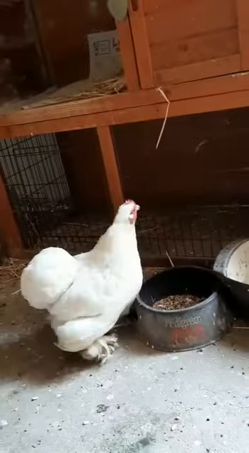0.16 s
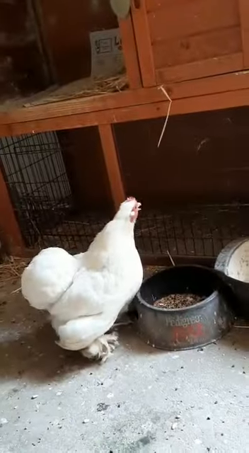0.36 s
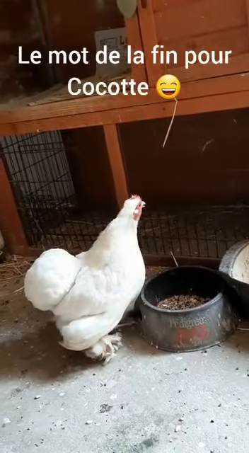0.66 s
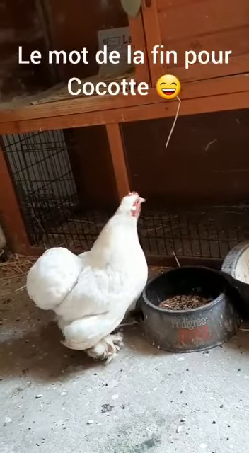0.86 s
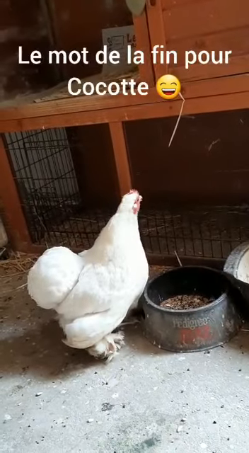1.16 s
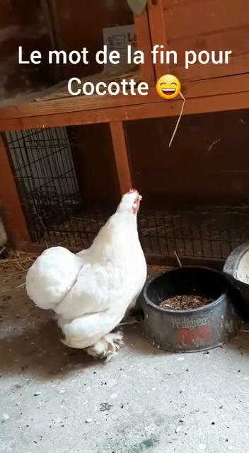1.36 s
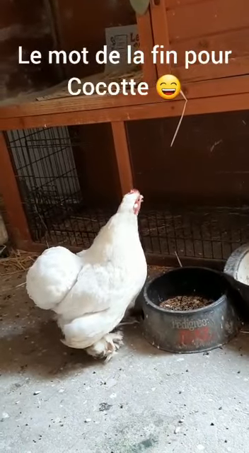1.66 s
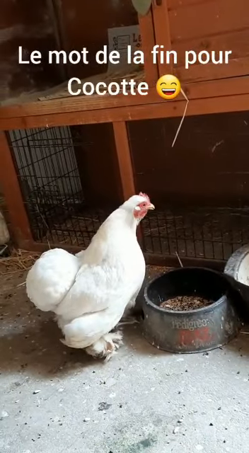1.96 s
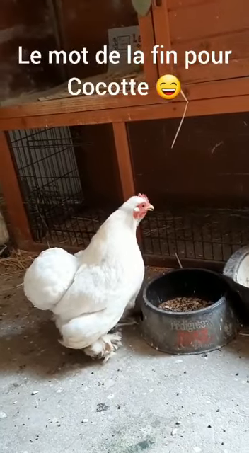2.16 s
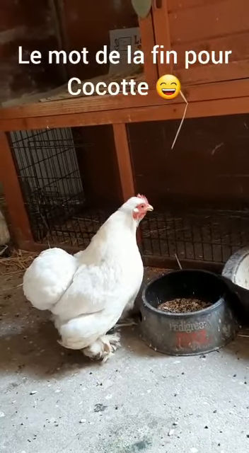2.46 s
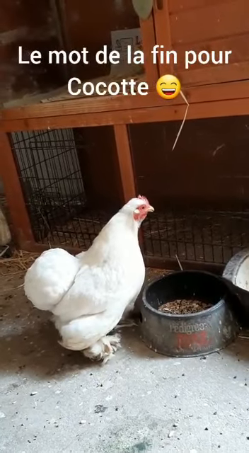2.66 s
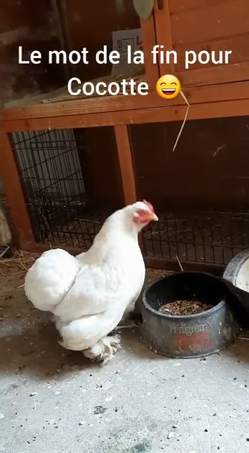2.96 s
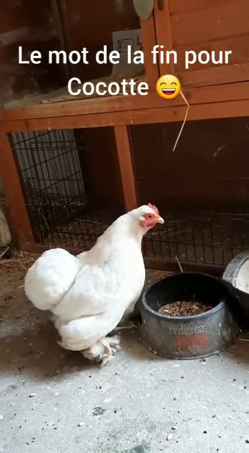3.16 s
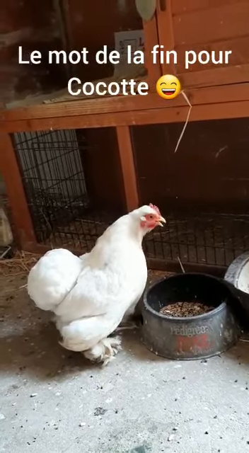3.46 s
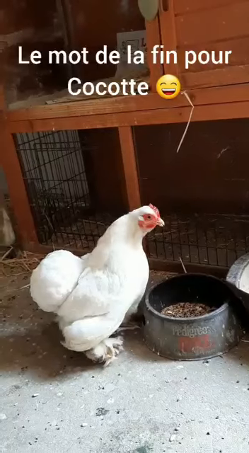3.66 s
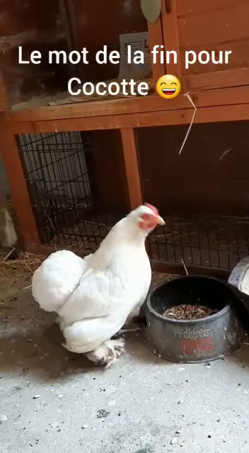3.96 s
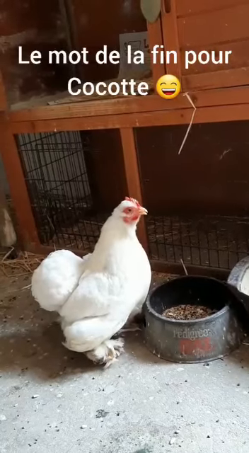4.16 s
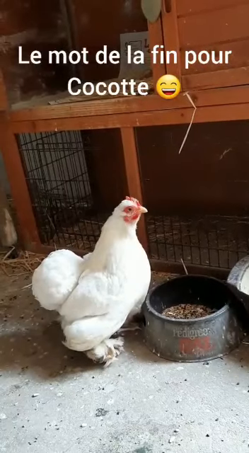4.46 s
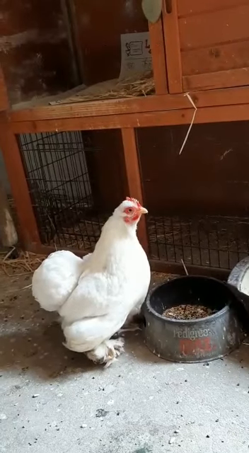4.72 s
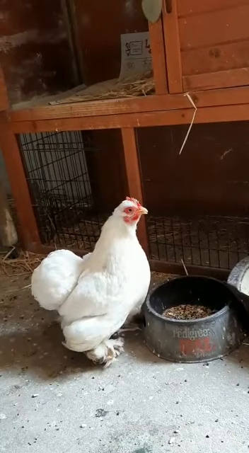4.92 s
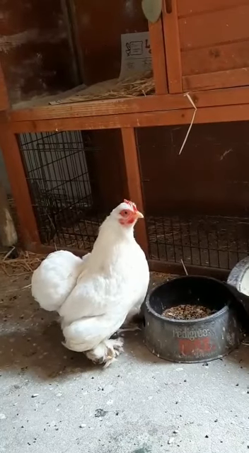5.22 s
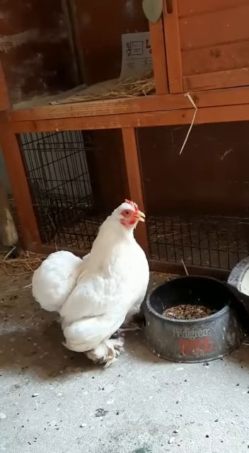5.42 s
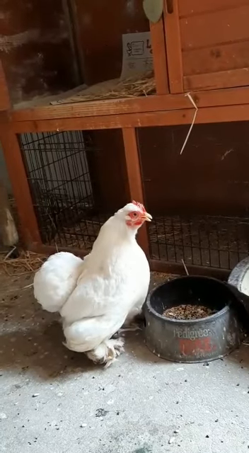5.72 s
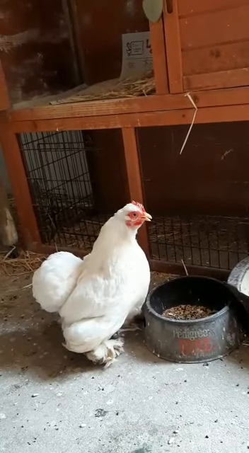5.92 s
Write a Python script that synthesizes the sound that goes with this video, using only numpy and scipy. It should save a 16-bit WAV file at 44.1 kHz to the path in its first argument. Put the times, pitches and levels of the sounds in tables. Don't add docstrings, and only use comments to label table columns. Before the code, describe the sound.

A hen in a hard-walled shed gives short low clucks and four loud, clear squawks that grow stronger, with faint bird squeaks and a handling bump.

```python
import sys
import numpy as np
from scipy import signal
from scipy.fft import rfft, irfft, next_fast_len
from scipy.io import wavfile
from scipy.ndimage import uniform_filter1d, map_coordinates

SR = 44100
rng = np.random.default_rng(int(sys.argv[2]) if len(sys.argv) > 2 else 0)


def int16_out(signal):
    q = np.round(np.clip(np.atleast_2d(signal).T, -1, 1) * 32767)
    wavfile.write(sys.argv[1], SR, q.astype(np.int16))


def ratio(d):
    e = np.asarray(d, float) / 20
    return 10 ** e


N = 268402
LEAD = SR // 4

# (start [s], voice breaks after [s], high note [Hz], last push [Hz], level [dB])
SQUAWK_CALLS = [
    (.261, .249, 705.8, 722.8, -23),
    (1.631, 0.27, 693, 735.4, -22.5),
    (3.366, .269, 697.8, 753.4, -21),
    (5.364, 0.24, 732.5, 728, -19.5),
]
# (start [s], length [s], register flip after [s], upper register [Hz], level [dB])
CLUCK_CALLS = [(-.16, 0.081, 0.055, 410.6, -34.5), (0.23, 0.04, 0.02, 391, -39),
               (0.839, 0.066, 0.011, 458.6, -36), (1.201, 0.11, 0.058, 453.9, -38),
               (1.583, 0.063, 0.038, 421.4, -38), (2.256, 0.064, 0.021, 439, -36),
               (2.625, 0.1, 0.062, 413, -37), (2.922, 0.088, 0.03, 398.2, -38),
               (3.333, 0.043, 0.019, 418.5, -36), (3.994, 0.061, 0.017, 445, -36.5),
               (4.34, 0.057, .015, 280, -37.5), (4.668, 0.056, 0.034, 271, -37),
               (5.076, 0.057, 0.037, 262, -34), (5.328, 0.046, 0.025, 419, -30),
               (5.944, 0.081, 0.018, 441.2, -33)]
# (centre [Hz], width [Hz], level [dB])
SHUT_BEAK_MODES = [(300.5, 186, 5.5), (836, 83, 3.5), (1035, 221, 7), (1464, 75, 1), (3393, 230, -7),
                   (4730, 130, -8.5), (7600, 460, -30.5), (12920, 6600, -14)]
# (centre [Hz], width [Hz], level [dB])
OPEN_BEAK_MODES = [(694, 150, -22.5), (1363, 294, 1.5), (2080, 396, 2.5), (3320, 600, -5.5),
                   (5590, 450, -9.5), (9100, 1500, -18), (11900, 9600, -18)]
# (centre [Hz], width [Hz], depth [dB])
SHUT_BEAK_HOLLOWS = [(2520, 750, -11), (4300, 600, -17), (7250, 600, -16), (8600, 400, -9),
                     (9900, 600, -12), (12400, 500, -7)]
# (centre [Hz], width [Hz], depth [dB])
OPEN_BEAK_HOLLOWS = [(2560, 750, -16), (3100, 400, -6), (4620, 450, -12), (6350, 400, -13),
                     (8900, 600, -11), (10400, 500, -7), (13700, 600, -7)]
# (start [s], length [s], first pitch [Hz], last pitch [Hz], level [dB])
FAR_BIRD_SQUEAKS = [
    (2.205, 0.048, 1690, 1518, -58.5),
    (2.558, 0.069, 1577, 1531, -53.5),
    (5.741, .11, 1627, 1877, -45),
]
# (frequency [Hz], decay time t60 [s])
WALL_DECAY = [(200, 0.67), (400, 0.53), (750, 0.5), (1500, 0.45), (3000, 0.44), (8000, 0.31), (16000, 0.18)]
# (frequency [Hz], left-right likeness [0-1])
ECHO_LIKENESS = [(150, 0.94), (400, 0.68), (1000, 0.052), (2500, 0)]
# (time [s], tick level [dB], rumble level [dB], rumble t60 [s])
GRIP_CREAKS = [
    (4.326, -43, -53.5, 0.8),
    (5.069, -61.5, -68, 1),
]
# (time [s], level [dB])
SLEEVE_LEVEL = [(0, -98), (4.299, -83), (4.751, -71.5), (5.0, -67), (5.3, -53), (5.902, -68), (6.1, -83)]
# (frequency [Hz], density [dB per Hz])
AIR_SPECTRUM = [(18, -55.5), (30, -45.5), (1130, 0), (2610, -28), (3490, -16), (4190, -21), (5040, -14),
                (7270, -36.5), (16000, -21)]
# (frequency [Hz], left minus right [dB])
PORT_IMBALANCE = [(60, -1.5), (110, -1.0), (200, 0.5), (380, 0.5), (700, 1.0), (1290, 0.5), (2380, -0.5),
                  (4400, -0.5), (8120, -3.5), (15000, -6.5)]


def squawk(length, note_hz, push_hz, db):
    middle_hz, step_hz = 437.1, 568.7
    ladder = [  # (time [s], pitch [Hz], effort [dB], beak opening [0-1])
        (0, .97 * middle_hz, -7.5, 0.18),
        (.037, 1.03 * middle_hz, -12, 0.18),
        (.052, step_hz, -2, 0.32),
        (.074, step_hz + 40.36, -2, 0.32),
        (.104, note_hz, 0, 1),
        (length - .06, note_hz, -3, 1),
        (length, push_hz, -1.5, 1),
        (length + .013, step_hz, -2.5, 0.32),
        (length + .029, 456, -12, 0.32)]
    when, pitch, effort, opening = np.transpose(ladder)
    t = np.arange(0, when[-1], 1 / SR)
    settling = np.maximum(t - when[4], 0) / .03
    overshoot = .014 * np.e * settling * np.exp(-settling)
    hz = np.interp(t, when, pitch) * (1 + overshoot + .003 * wobble(25, len(t)))
    effort_db = np.interp(t, when, effort) + 1.5 * wobble(45.7, len(t))
    beak = np.interp(t, when, opening)
    rough = np.interp(hz, [450, 620, 695], [.18, .11, .03])
    return voice(hz, db + effort_db, beak, rough, loose=.2)


def cluck(length, flip, high_hz, db):
    low_hz = 296.9
    t = np.arange(round(length * SR)) / SR
    upper = np.clip((t - flip) / .012 + .5, 0, 1)
    rise = -0.0901 * np.exp(-t / 0.01098)
    sag = -.15 * np.exp((t - length) / 0.00965)
    arch = 1 + rise + 1.1 * (t - flip) * upper + sag
    rough = .18 + .08 * upper + .4 * upper * (1 - upper)
    neck = (430 / high_hz) ** 0.16
    hz = (low_hz + (high_hz - low_hz) * upper) * arch
    level_db = db - 1.5 * (1 - upper) - 6 * np.exp(-t / 0.0026)
    return voice(hz, level_db, 0 * t, rough, neck)


def voice(hz, db, beak, rough, neck=1, loose=1):
    n = len(hz)
    rough, beak = np.clip(rough, 0, 1), np.clip(beak, 0, 1)
    hz = hz * (1 + .002 * wobble(40, n) + .1 * rough * wobble(200, n))
    turn = 2 * np.pi * np.cumsum(hz) / SR

    k = np.arange(1, 64)[:, None]
    spread = .13 * k ** 2
    slack = loose * np.exp(-np.arange(n) / (0.0088 * SR))
    bloom = ratio(-9 * slack * np.log2(1 + k * hz / 2000))
    unrest = [wobble(33.06, n) for _ in k]
    flicker = ratio(1.46 * np.log2(1 + k * hz / 3000) * unrest)
    audible = k * hz < .4 * SR
    pulses = np.sum(np.cos(k * turn + spread) * flicker * bloom * audible, axis=0)
    pulses = pulses * np.sqrt(2 * hz / (.4 * SR))
    breath = 1.6 * (1 - slack) * rng.standard_normal(n) * (.5 + .5 * np.cos(turn))

    fade_in, fade_out = np.arange(n) / .009 / SR, np.arange(n)[::-1] / .012 / SR
    edge = np.clip(np.minimum(fade_in, fade_out), 0, 1) ** 1.5
    limp = 1 + 1.28 * rough * (1 + .5 * wobble(30.5, n)) * np.cos(turn / 2)
    size = ratio(db + 7 * rough * wobble(150, n)) * limp * edge
    flow = size * (np.sqrt(1 - rough ** 2) * pulses + rough * breath)

    flow = np.pad(flow, (0, 800))
    beak = np.pad(beak, (0, 800), mode="edge")
    shut = filtered(flow, throat(SHUT_BEAK_MODES, SHUT_BEAK_HOLLOWS, neck))
    wide = filtered(flow, throat(OPEN_BEAK_MODES, OPEN_BEAK_HOLLOWS, neck))
    return ratio(9) * ((1 - beak) * shut + beak * wide)


def throat(modes, hollows, neck):
    def response(f):
        g = f * neck
        notch = 1
        for c, w, db in hollows:
            stiff, damped = c * c - g * g, 1j * g * w
            notch = notch * (stiff + damped * ratio(db)) / (stiff + damped)
        radiated = (1j * f / (230 + 1j * f)) ** 5
        return tract(modes)(g) * notch ** 2 * radiated
    return response


def tract(modes):
    return lambda f: sum(ratio(db) * 1j * f * w / (c * c - f * f + 1j * f * w) for c, w, db in modes)


def squeak(length, first_hz, last_hz, db):
    u = np.arange(round(length * SR)) / (length * SR)
    glide = first_hz + (last_hz - first_hz) * np.sin(np.pi * u / 2)
    hz = glide * (1 + 0.208 * length * wobble(314, len(u)))
    turn = 2 * np.pi * np.cumsum(hz) / SR
    tone = np.sin(turn) + ratio(-2.5) * np.sin(2 * turn) + ratio(-16) * np.sin(3 * turn)
    return ratio(db + 2.4 * wobble(121.5, len(u))) * np.sin(np.pi * u) ** 0.32 * tone


def shed(x, wet_db):
    hz, t, z = signal.stft(rng.standard_normal((2, SR * 2 // 3)), SR, nperseg=256)
    hz = hz[:, None]
    angle = np.arccos(np.clip(along(ECHO_LIKENESS, hz), -1, 1)) / 2
    mid, side = z[0] * np.cos(angle), z[1] * np.sin(angle)
    decay_db = np.log2(1 + hz / 4000) - 60 * t / along(WALL_DECAY, hz)
    tail = signal.istft(np.array([mid + side, mid - side]) * ratio(decay_db), SR, nperseg=256)[1]
    tail = ratio(wet_db) * tail / np.linalg.norm(tail[0])
    tail = np.pad(tail, ((0, 0), (150, 0)))
    tail[[0, 1], rng.integers(0, 18, size=2)] = 1
    return signal.fftconvolve(x[None], tail, axes=1)


def creak(db, rumble_db, t60):
    t = np.arange(SR // 2) / SR
    body = tract([(140, 260, 20)])
    noise = rng.standard_normal((3, len(t)))
    low = filtered(noise, lambda f: body(f) * f / (f - 50j) / (1 + 1j * f / 400))
    tick = ratio(db - 60 * t / 0.0087) * np.diff(rng.standard_normal((2, len(t) + 1)))
    rumble = ratio(rumble_db - 60 * t / t60 + 3.3 * wobble(44, len(t)))
    return tick + rumble * (low[2] + low[:2] / 2)


def sleeve():
    s, db = np.transpose(SLEEVE_LEVEL)
    level_db = np.interp(np.arange(N) / SR, s, db) + 4 * wobble(90, N)
    grain = rng.standard_normal((2, N)) * ratio(level_db)
    return filtered(grain, lambda hz: (hz / (hz + 1j * 9000)) ** 4)


def air_and_hiss():
    air = filtered(rng.standard_normal((2, N)), lambda hz: ratio(along(AIR_SPECTRUM, hz)))
    return ratio(-65.5) * air / np.std(air)


def along(points, hz):
    f, v = np.transpose(points)
    return np.interp(np.log(hz + 1), np.log(f + 1), v)


def wobble(rate, n):
    knots = rng.standard_normal(int(n * rate / SR) + 4)
    return map_coordinates(knots, [np.arange(n) * rate / SR])


def filtered(x, response):
    m = next_fast_len(x.shape[-1] + 4096)
    return irfft(rfft(x, m) * response(np.fft.rfftfreq(m, 1 / SR)), m)[..., :x.shape[-1]]


def add(track, s, x):
    part = track[:, LEAD + round(s * SR):][:, :x.shape[1]]
    part += x[:, :part.shape[1]]


def scene():
    track = np.zeros((2, N + LEAD))
    for s, *call in SQUAWK_CALLS:
        add(track, s, shed(squawk(*call), wet_db=0.0))
    for s, *call in CLUCK_CALLS:
        add(track, s, shed(cluck(*call), wet_db=2.0))
    for s, *call in FAR_BIRD_SQUEAKS:
        add(track, s, shed(squeak(*call), wet_db=3.5))
    for s, *grip in GRIP_CREAKS:
        add(track, s, creak(*grip))
    return track[:, LEAD:] + sleeve() + air_and_hiss()


def low_pass(x):
    return signal.sosfilt(signal.butter(12, 16820, fs=SR, output="sos"), x)


def record(dry):
    def ports(hz):
        treble = np.clip((15950 - hz) / 300, 0, 1) / (1 + (hz / 14500) ** 6)
        return treble * ratio(np.outer([.5, -.5], along(PORT_IMBALANCE, hz)))

    x = filtered(dry, ports)
    power = np.abs(uniform_filter1d(np.mean(x ** 2, axis=0), size=900)) + 1e-12
    diaphragm = tract([(75, 90, 16.7)])
    flutter = filtered(rng.standard_normal((3, N)), lambda f: diaphragm(f) * f / (f - 25j))
    unrest = .85 * flutter[:2] + flutter[2]
    x = x + ratio(-61.5) * power ** 0.16 * unrest
    gate = ratio(0.75 * np.minimum(10 * np.log10(power) + 55, 0))
    return low_pass(x * gate)


dry = scene()
out = record(dry)
int16_out(out)
```